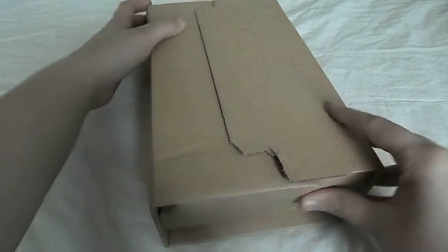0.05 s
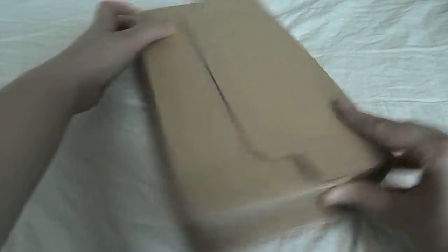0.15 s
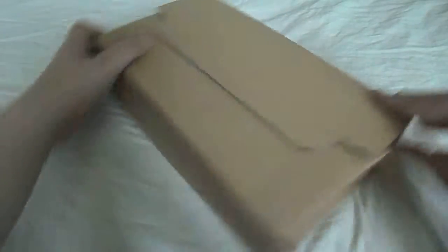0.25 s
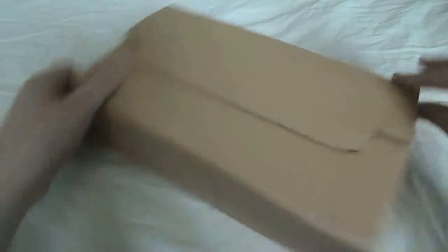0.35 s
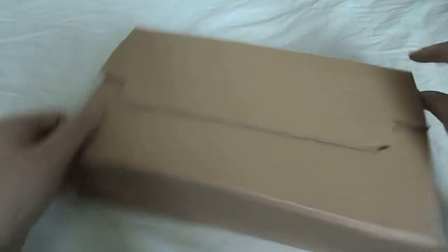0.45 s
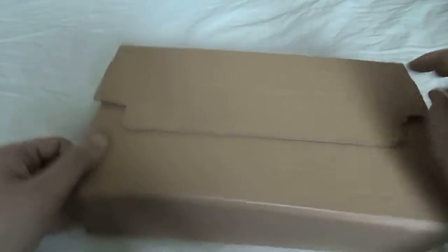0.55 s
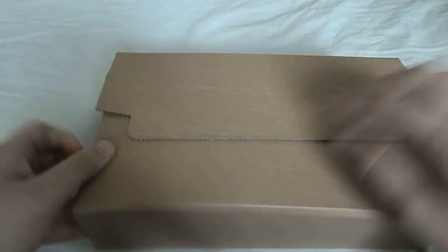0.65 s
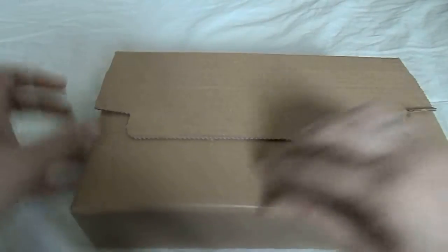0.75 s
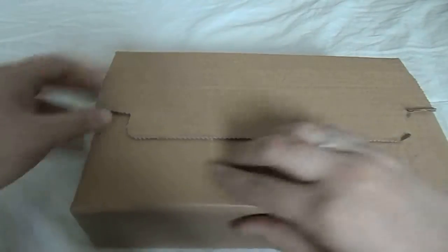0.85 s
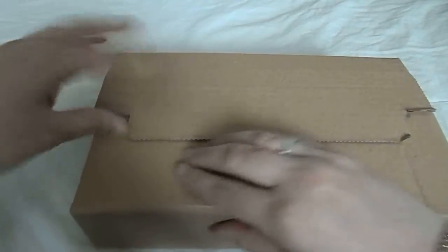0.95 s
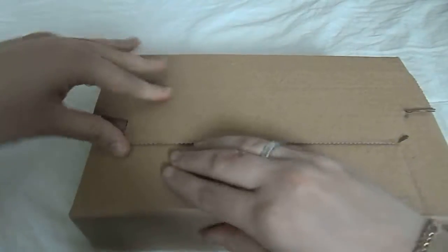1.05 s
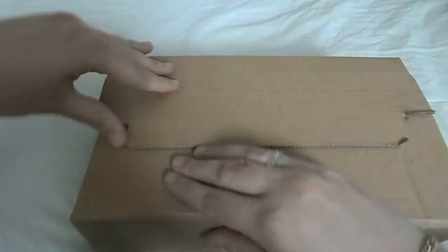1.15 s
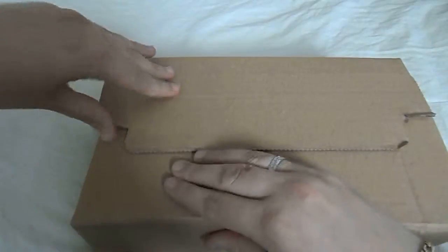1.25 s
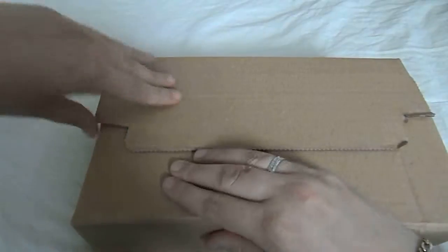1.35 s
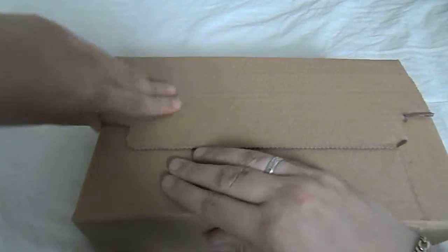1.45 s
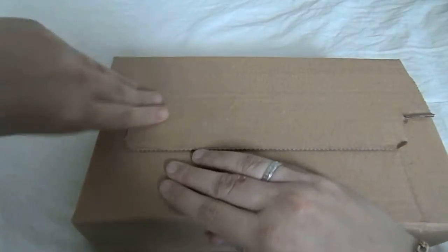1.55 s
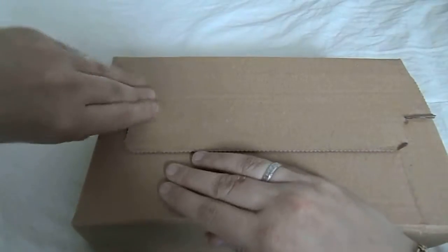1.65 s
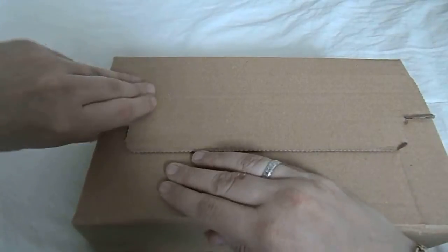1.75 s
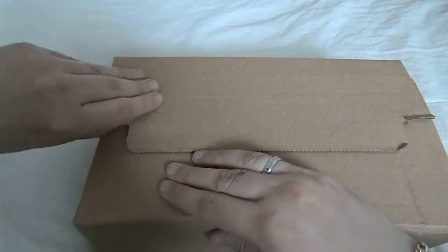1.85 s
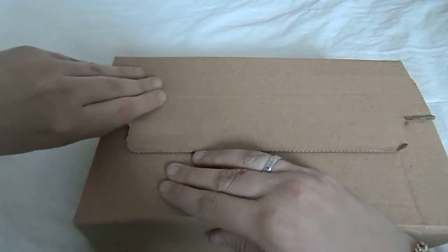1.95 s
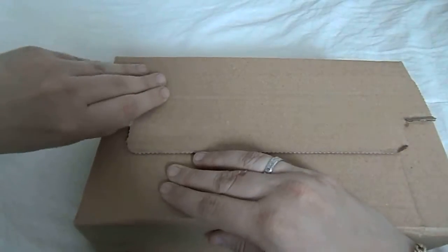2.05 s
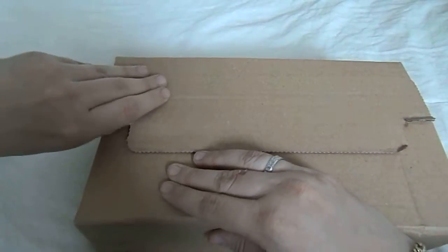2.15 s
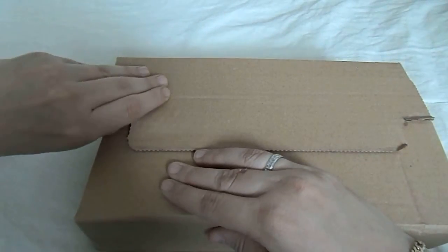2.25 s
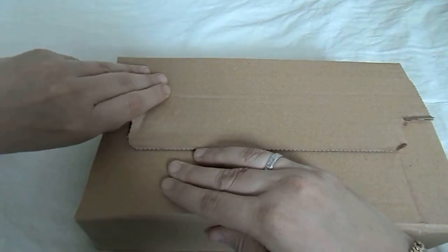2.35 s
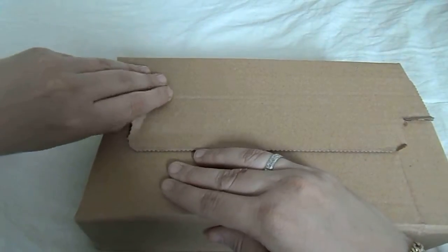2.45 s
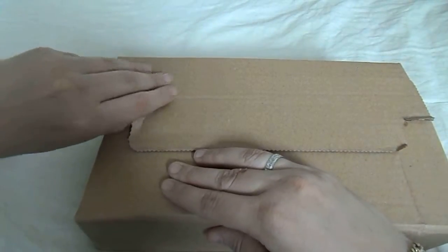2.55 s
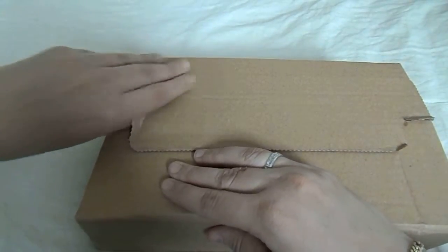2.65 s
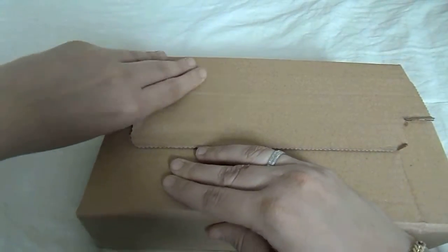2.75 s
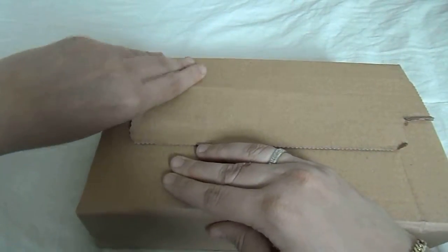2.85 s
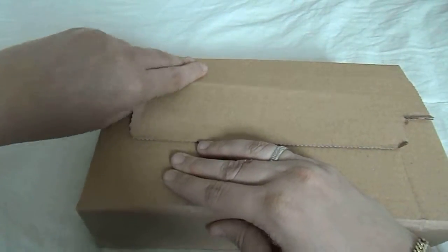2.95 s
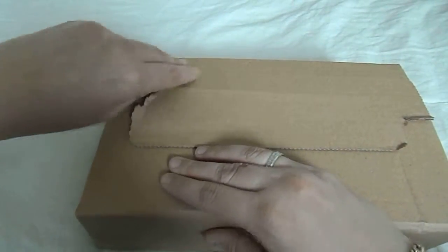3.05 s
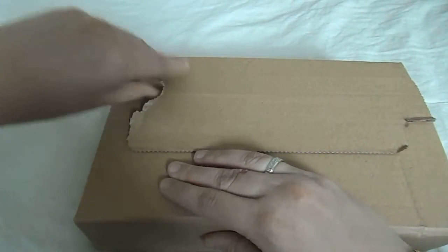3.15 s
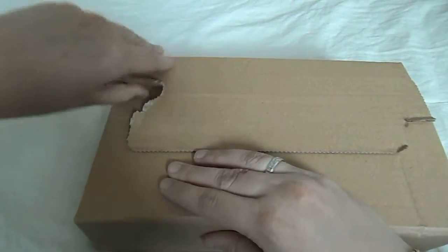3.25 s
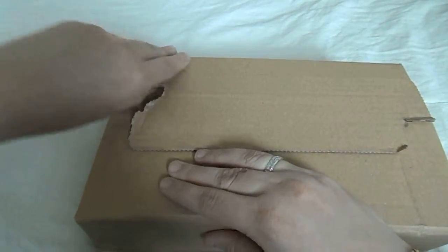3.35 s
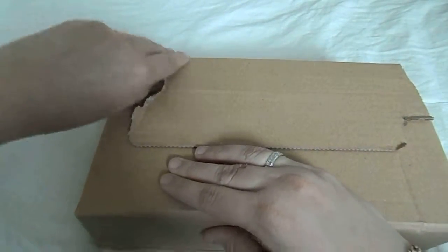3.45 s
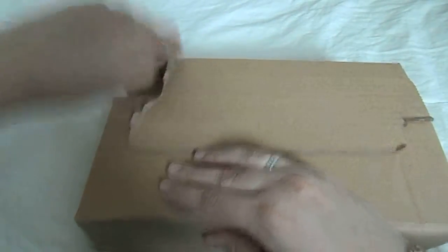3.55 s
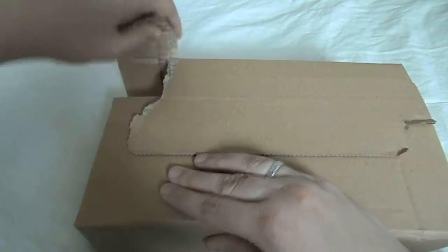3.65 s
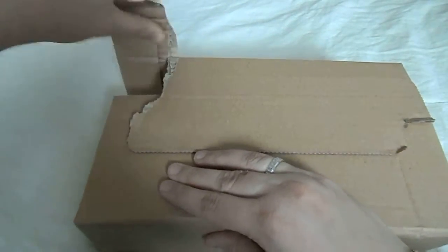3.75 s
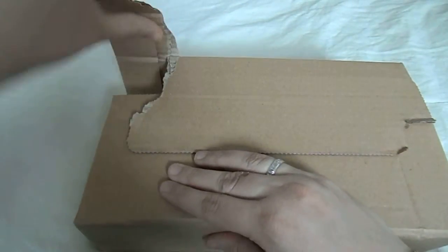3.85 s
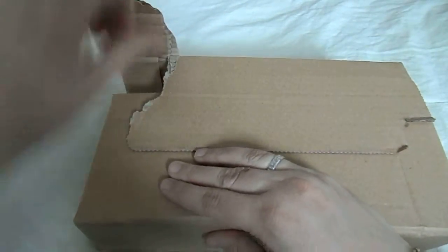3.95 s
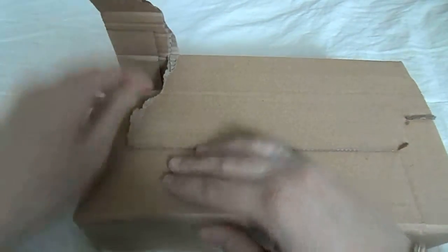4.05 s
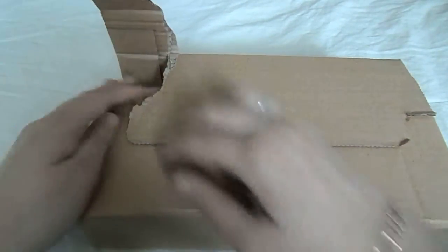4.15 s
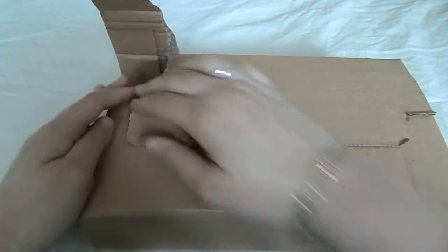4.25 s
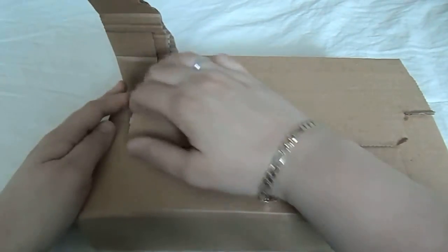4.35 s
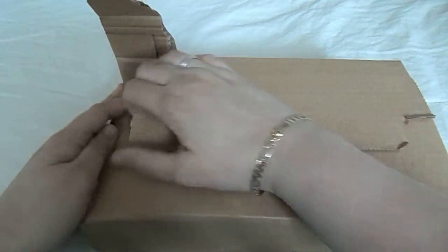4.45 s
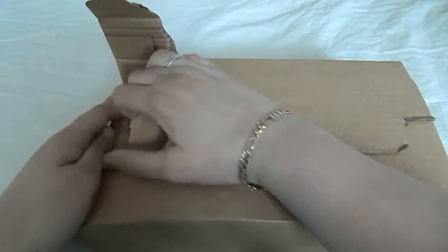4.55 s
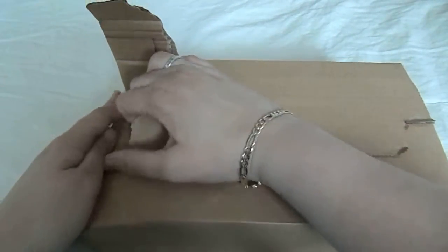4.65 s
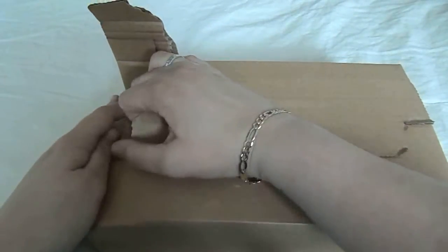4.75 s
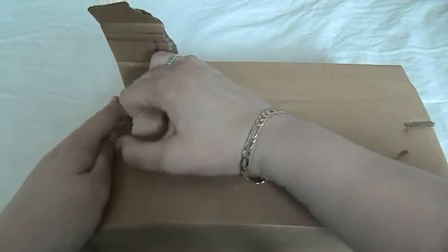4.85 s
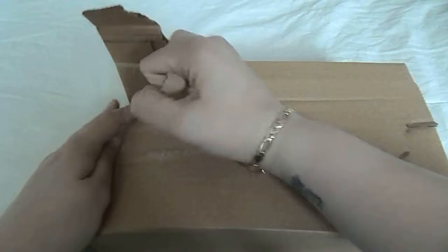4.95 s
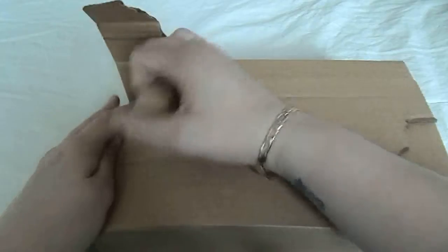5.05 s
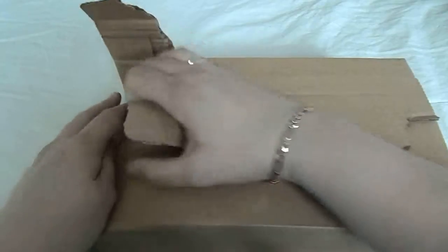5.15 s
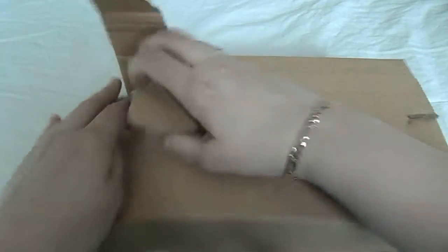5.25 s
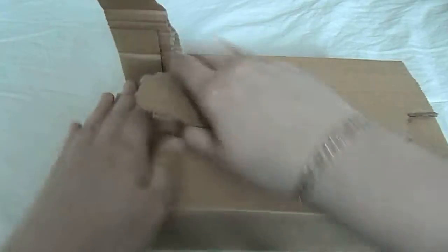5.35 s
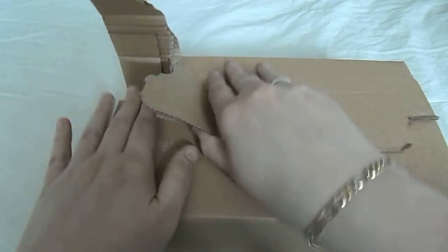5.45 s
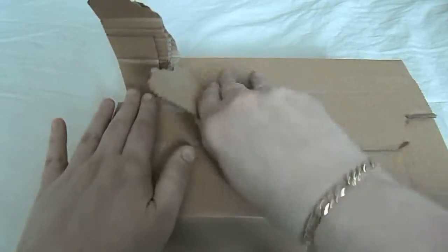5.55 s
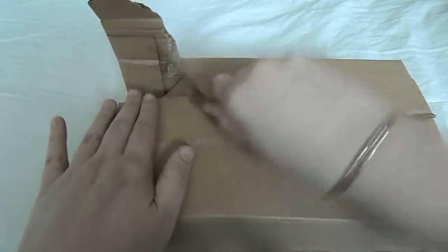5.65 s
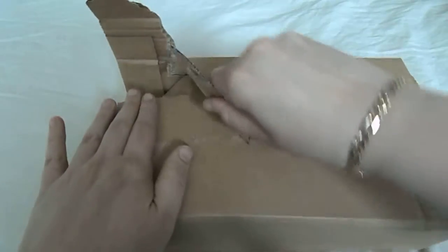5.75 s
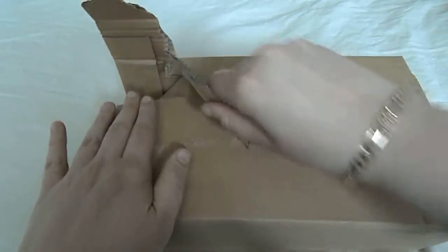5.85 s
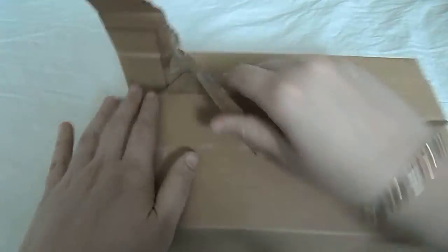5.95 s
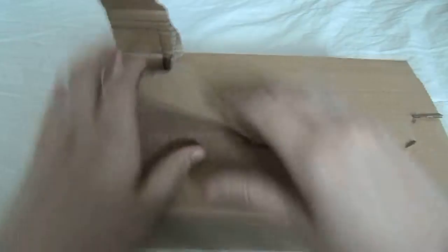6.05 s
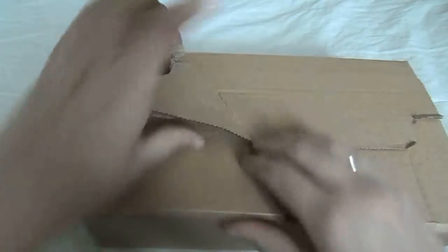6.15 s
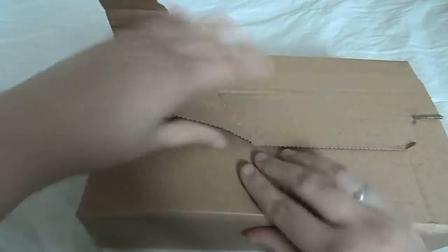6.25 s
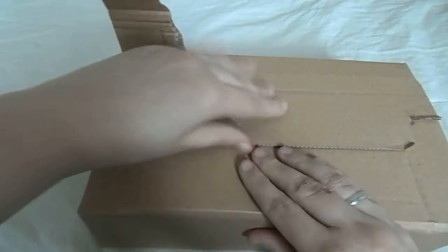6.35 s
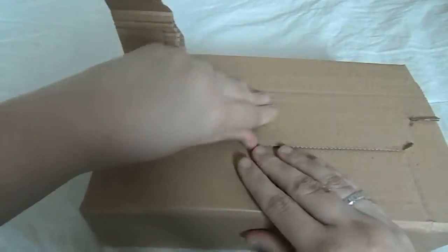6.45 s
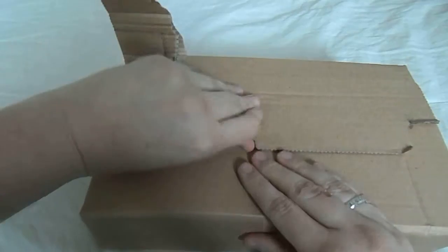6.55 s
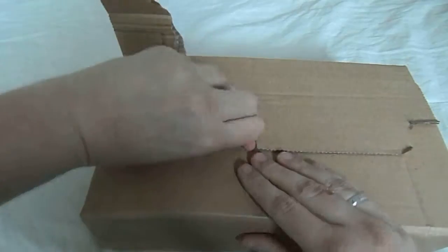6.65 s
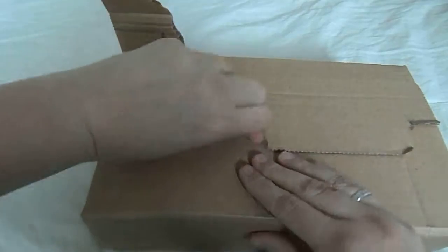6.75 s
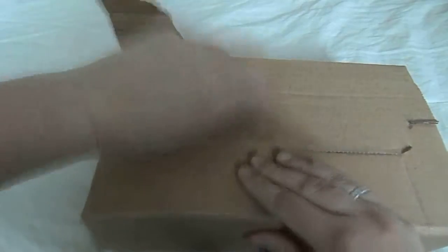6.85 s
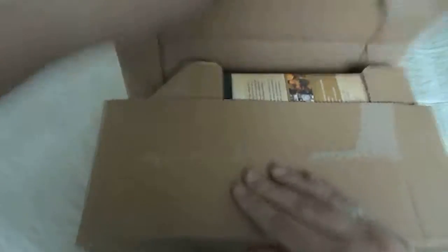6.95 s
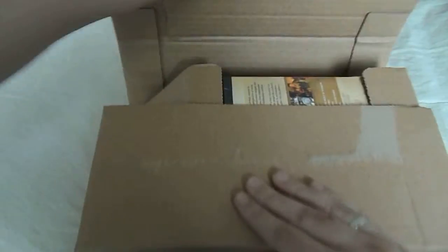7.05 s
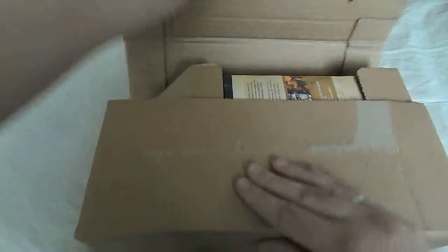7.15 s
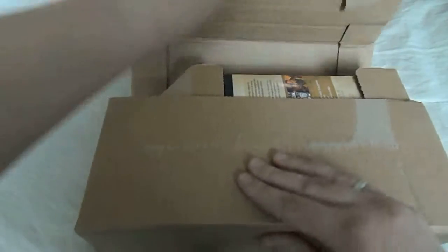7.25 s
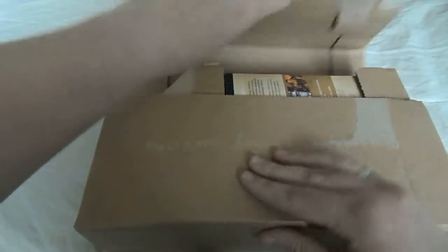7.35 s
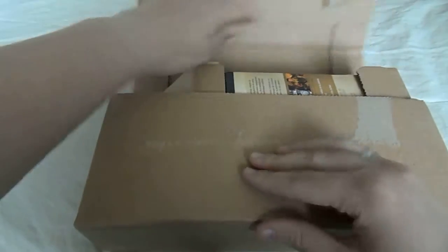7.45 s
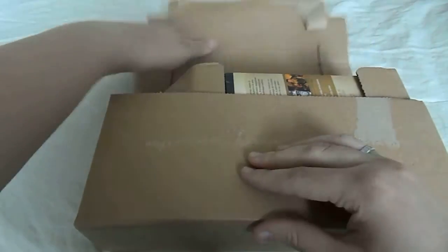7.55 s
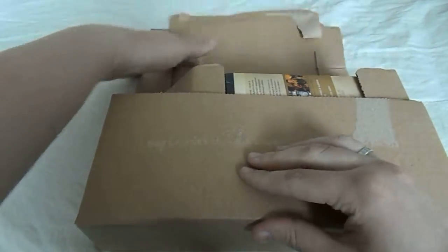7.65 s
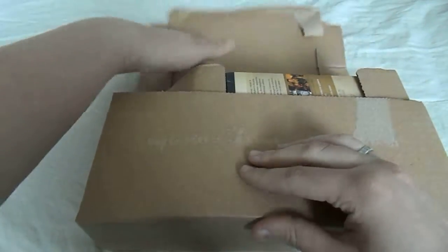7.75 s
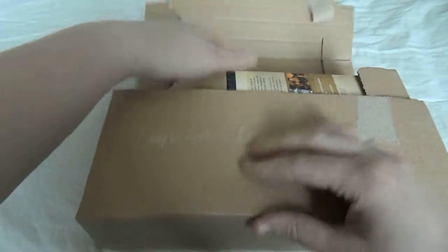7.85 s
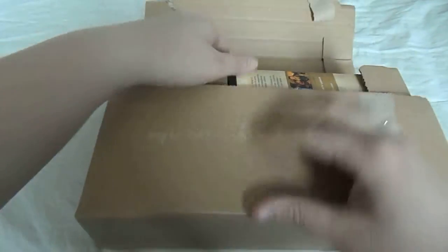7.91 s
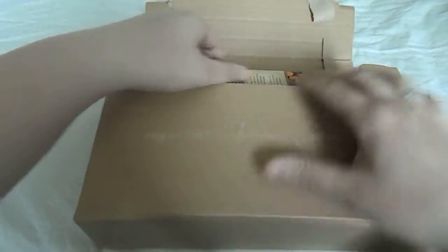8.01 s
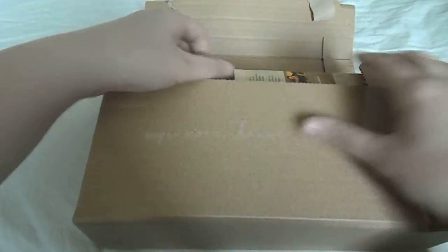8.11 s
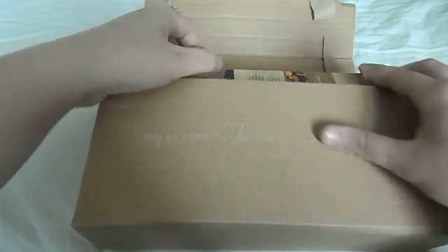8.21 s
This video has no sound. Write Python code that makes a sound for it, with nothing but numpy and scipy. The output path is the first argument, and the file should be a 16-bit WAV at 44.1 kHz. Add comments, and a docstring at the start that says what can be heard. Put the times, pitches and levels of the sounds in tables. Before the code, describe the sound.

Hands rub and press a hollow cardboard box, then tear it open with crackling fibres, sharp snaps and one loud pop, close up indoors.

```python
"""Bedroom: a cardboard box on a bed is turned, pressed and torn open by hand, heard close by in stereo.
Snaps of glue and fibres are noise bursts and short tone swings that drum the hollow box; a flap creaks.
Fingers and sheet rub the card as fluttering, ticking noise. Noise bursts and rubbing ring shared box
modes; the tone swings and creak sound directly. The walls answer the snaps with decaying noise;
hiss and a faint far hum lie beneath. The loudest snaps clip."""
import sys
import numpy as np
from scipy import signal
from scipy.fft import rfft, irfft, next_fast_len
from scipy.io import wavfile
from scipy.ndimage import uniform_filter1d, map_coordinates

SR = 44100
rng = np.random.default_rng(int(sys.argv[2]) if len(sys.argv) > 2 else 0)


def wav_out(sig):
    """Save sig, one row per channel (or a flat mono array), as 16-bit PCM at SR to the path in sys.argv[1]."""
    wavfile.write(sys.argv[1], SR, np.round(np.clip(np.atleast_2d(sig).T, -1, 1) * 32767).astype(np.int16))


N = 365148

# Room and microphone noise spectrum: (frequency [Hz], relative density [dB])
HISS_SPECTRUM = [(30, -45), (90, -4), (270, 7), (530, 1), (760, 4), (1320, -4), (2500, -9), (4500, -9.5),
                 (8000, -14.5), (12600, -35), (16000, -9)]
# Left-right likeness of noise: (frequency [Hz], correlation [-1..1])
STEREO_LIKENESS = [(60, -1.3), (150, 0.84), (500, 1), (1500, 0.83), (3000, 0.56), (6000, 0.11),
                   (14000, 0.16)]
# Panel, hollow, crack, fibre: (low edge [Hz], high edge [Hz], room level [dB], room T60 [s])
PART_BANDS = [(526, 1230, -9, 0.22), (197, 542, -10.5, 0.2), (1500, 5860, -7.5, 0.28),
              (4930, 24400, -9, 0.21)]
# Modes of the box: (frequency [Hz], width [Hz], relative level [dB])
BOX_MODES = [(274.5, 85, -3.5), (411, 103, 4.5), (520, 140, 3.5), (610, 139, 4), (733, 237, 0),
             (988, 186, 2), (1296, 480, -2), (1600, 422, 4.5), (2074, 1180, 3), (2860, 933, 4.5),
             (3620, 746, 2.5), (4470, 850, -1), (5480, 2400, -3), (7340, 8000, -7), (12830, 8400, -11)]
# Echoes off bed, hands and headboard: (delay [ms], level [dB])
NEAR_ECHOES = [(1.9, -33), (3.4, -20.5), (8.2, -16), (14.7, -21)]
# Flap bending before it rips: (time [s], level [dB])
CREAK_LEVELS = [(3.32, -72), (3.336, -54), (3.365, -43), (3.43, -50), (3.46, -72), (3.51, -62),
                (3.53, -32.5), (3.601, -36), (3.617, -11.5), (3.66, -70)]
# Hands resting on the card: (panel, hollow, crack, fibre) levels [dB]
REST_DB = [-55.5, -54, -67, -58.5]
# Strokes of rubbing and tearing: (full strength from [s], rise [s], hold [s], fall [s],
# panel [dB], hollow [dB], crack [dB], fibre [dB])
STROKES = [(0.06, 0.23, 0.0083, 0.1, -44.5, -57, -45.5, -43),
           (0.233, 0.089, 0.26, .5, -39, -44.5, -38, -37.5), (0.683, .2, .03, 0.18, -43.5, -51, -50.5, -48),
           (0.904, 0.091, 0.05, 0.17, -41.5, -48, -44, -39), (1.0, 0.061, .04, 0.067, -53, -60, -50, -40),
           (1.046, 0.035, 0.02, 0.055, -36, -62, -45, -41),
           (1.212, 0.094, 0.017, 0.12, -36, -54, -46.5, -41),
           (1.37, 0.27, 0.029, 0.23, -41, -45, -45, -42.5),
           (1.586, 0.22, 0.12, 0.16, -42.5, -42, -50, -48.5),
           (1.765, .1, 0.16, 0.37, -41.5, -45.5, -44.5, -48),
           (2.045, 0.066, 0.0096, 0.092, -38, -36, -38, -37),
           (2.236, 0.074, 0.083, 0.31, -45, -50, -49, -47),
           (2.403, 0.066, 0.039, 0.042, -38, -39, -37.5, -37.5),
           (2.664, 0.14, 0.04, 0.057, -32.5, -37.5, -37, -40.5),
           (2.744, .02, 0.05, 0.16, -39.5, -43, -46, -41), (2.971, .012, 0.0087, .05, -27.5, -38, -30, -31),
           (3.061, 0.075, 0.0062, 0.11, -26.5, -28, -27, -32.5),
           (3.15, .05, 0.098, 1, -39.5, -43, -45.5, -45), (3.526, 0.01, 0.062, .05, -38.5, -36, -44, -35),
           (3.615, 0.019, 0.034, 0.14, -27.5, -35, -22.5, -25.5),
           (4.164, 0.061, 0.048, 0.061, -36, -46, -42.5, -43),
           (4.334, 0.0084, 0.12, 0.14, -34, -40, -36, -42), (4.523, .12, 0.015, 0.59, -31, -38, -38, -40.5),
           (4.876, 0.034, .05, 0.16, -25.5, -36, -26.5, -28), (5.312, 0.17, 0.14, 0.3, -33, -42, -37, -37),
           (5.667, 0.032, 0.073, 0.14, -33.5, -48, -33, -31.5),
           (6.04, 0.33, .01, 0.018, -37, -44, -41.5, -40.5),
           (6.055, 0.011, 0.039, 0.14, -25.5, -33, -36.5, -44),
           (6.158, .03, 0.084, 0.084, -34, -45, -41.5, -43.5),
           (6.325, 0.15, 0.075, 0.069, -30.5, -43, -38, -41),
           (6.448, 0.066, 0.069, 0.19, -40, -42, -41.5, -41.5),
           (6.673, 0.086, 0.016, 0.45, -41, -43, -42, -41),
           (6.927, 0.019, 0.043, 0.015, -18.5, -20, -14, -23),
           (6.974, .02, 0.0081, 0.13, -24, -27, -30, -29.5), (7.295, 0.16, .02, 0.27, -44, -43, -48, -48.5),
           (7.534, 0.15, .09, 0.18, -42, -44.5, -45.5, -44.5),
           (7.898, 0.064, 0.095, 0.6, -40.5, -51, -43, -39.5), (8.05, 0.27, .2, .2, -36.5, -39, -36, -40)]
# Snaps and taps: (time [s], panel [dB], hollow [dB], crack [dB], fibre [dB],
# burst 1/e time [ms], panel swing [Hz])
SNAPS = [(0.573, -26, -30, -30.5, -25.5, 14, 515), (0.9399, -29.5, -30.5, -29, -27, 8.5, 1005),
         (1.2295, -26, -49, -42, -40, 2.4, 884), (1.2414, -22, -52, -11, -8.5, 0.55, 1020),
         (1.41, -32, -40, -35, -32.5, 9.5, 910), (1.5448, -28.5, -26.5, -43, -35, 6.1, 1000),
         (1.5551, -40, -29.5, -35, -31.5, 36, 1217), (1.5984, -52, -24, -39, -35, 8.3, 1080),
         (1.6423, -34, -17, -49, -50, 1.3, 523), (1.6855, -34, -44, -32.5, -32, 13, 587),
         (1.7223, -28, -39, -52, -48, 4.8, 990), (1.9338, -34, -31, -35, -29, 2, 920),
         (2.0484, -7, -16.5, -14.5, -11, 2, 650), (2.2106, -28, -37, -37, -52, 1.5, 606),
         (2.231, -39, -35, -29.5, -26.5, 2.4, 790), (2.3049, -28, -55, -25.5, -20, 1.8, 810),
         (2.381, -25, -40, -25, -20, 0.74, 770), (2.3956, -24.5, -41, -28, -22, 1.7, 584),
         (2.4164, -22, -49, -19, -36, 1.4, 656), (2.5224, -20.5, -28, -27, -47, 0.77, 1590),
         (2.5435, -26.5, -50, -50, -51, 1.8, 930), (2.6702, -29, -53, -22, -21, 2, 830),
         (2.7202, -13.5, -33, -7, -4.5, 6.6, 1040), (2.775, -18, -37, -11.5, -9.5, 1.6, 1150),
         (2.9657, -18, -54, -24, -22, 1.5, 656), (2.9772, -18, -31.5, -14, -7.5, 1.04, 560),
         (2.9926, -13.5, -36, -18, -33, 1, 1260), (3.0012, -24, -26, -23, -19.5, 4.8, 1020),
         (3.0395, -16, -27, -21, -16.5, 3.5, 910), (3.0455, -16.5, -29, -18.5, -20, 10, 1000),
         (3.0721, -8, -27, -14, -17, 8.1, 517), (3.0803, -9, -19, -19, -7.5, 2.8, 980),
         (3.087, -14, -36, -18, -12, 1.6, 696), (3.104, -17, -39, -31, -37, 0.93, 513),
         (3.3831, -24, -28.5, -44, -28, 2, 895), (3.52, -27, -29, -17, -17, 1.3, 1020),
         (3.533, -23.5, -30, -24, -27, 5, 513), (3.5584, -35, -32, -32, -29, 11, 990),
         (3.6104, -13, -15.5, -8, -10.5, 7.3, 790), (3.6217, -6, -13, -6, 1, 3.35, 740),
         (3.635, -22.5, -25, -16, -36, 12, 790), (3.6757, -22, -32, -18, -15.5, 5.6, 820),
         (3.7952, -30.5, -31, -48, -30, 10, 977), (3.862, -51, -45.5, -55, -36, 38, 760),
         (3.9458, -52, -58, -58, -32, 1.5, 1040), (3.9645, -57, -60, -35.5, -38, 4.2, 560),
         (4.003, -55, -64, -39, -52, 2.3, 730), (4.085, -33.5, -41, -41, -45, 3.3, 626),
         (4.124, -27, -26, -44, -51, 1.1, 1060), (4.1565, -25, -26, -40, -29, 3.2, 930),
         (4.2145, -29.5, -53, -44, -34, 8.8, 930), (4.247, -12.5, -27, -26, -29, 1.3, 820),
         (4.252, -16, -30, -27, -14.5, 1.9, 790), (4.3328, -11, -37, -16, -42, 1.5, 1040),
         (4.349, -18, -33, -38, -45, 1.1, 800), (4.361, -18, -43, -38, -42, 2, 810),
         (4.386, -17.5, -27, -43, -44, 3.2, 790), (4.4208, -26, -28, -30, -42, 6.1, 960),
         (4.43, -32, -32, -20, -31, 12, 990), (4.465, -39, -42, -21, -34, 2.8, 990),
         (4.491, -38, -42, -26, -33, 1.4, 990), (4.5943, -34, -17, -41, -47, 1.7, 645),
         (4.6593, -20, -32, -37, -49, 2.2, 850), (4.7682, -30.5, -45, -42, -35, 12, 1065),
         (4.818, -21, -49, -45, -42, 0.85, 1050), (4.856, -18.5, -41, -33, -27, 4.3, 850),
         (4.8721, -12.5, -14.5, -5, -3.5, 2.5, 1625), (4.882, -20, -42, -30, -10, 1.7, 1570),
         (4.9095, -12, -42, -22, -13, 1.9, 1050), (4.9227, -5, -30, 4.5, -3.5, 2.7, 1030),
         (4.934, -18, -35, -21, -7, 1.3, 1010), (4.943, -2.5, -4, -40, -3, 5.3, 1006),
         (5.0911, -31.5, -34, -23.5, -28, 1.3, 1590), (5.2332, -35, -30.5, -40, -60, 2.5, 1000),
         (5.3398, -22.5, -42, -43, -43, 4.5, 910), (5.5194, -19.5, -30, -21.5, -22, 2.7, 1040),
         (5.601, -34, -50, -58, -23, 1.8, 1120), (5.6619, -5.5, -28, -16, -1.5, 3.6, 900),
         (5.6704, -14.5, -21, -46, -14.5, 7.3, 1236), (5.6992, -35, -45, -42, -12, 1.8, 860),
         (5.736, -13.5, -33, -52, -13, 1.9, 1070), (5.8478, -29.5, -34, -37, -34, 5.8, 714),
         (5.946, -44, -55, -35, -24, 1.2, 1100), (6.0439, -2, -6.5, -8, -13, 3.37, 683),
         (6.122, -44, -43, -31, -25.5, 9.2, 900), (6.2026, -38, -42, -30, -36, 6.9, 890),
         (6.2424, -23, -37, -36, -44, 4.1, 1050), (6.3812, -40, -22.5, -47, -47, 2.1, 960),
         (6.3974, -25, -42, -49, -50, 5.2, 930), (6.504, -48, -50, -27, -40, 1.3, 1590),
         (6.52, -38, -50, -45, -30, 2, 670), (6.5636, -26, -39, -37, -46, 1.4, 880),
         (6.5757, -21, -20.5, -43, -42, 1.4, 900), (6.6188, -29, -25, -51, -55, 1.4, 710),
         (6.6393, -21, -29, -48, -44, 1.2, 750), (6.7733, -33, -43, -26, -34, 1.5, 930),
         (6.7813, -22.5, -28, -26, -25.5, 5.5, 950), (6.7924, -21, -28, -26, -6, 0.66, 1060),
         (6.9168, -0.5, -3, -3.5, 0.5, 4.8, 1000), (6.9398, -18, -8, -15, -5, 7, 645),
         (6.96, -16, -20, -5.5, -12, 3.8, 1030), (6.97, -10.5, -7.5, -28, -8, 5, 950),
         (6.9974, -25, -15.5, -37, -35, 3, 1130), (7.004, -28, -29, -37, -32, 2.3, 1310),
         (7.205, -37, -60, -39, -39, 2.4, 1040), (7.2992, -40, -21.5, -42, -46, 8.7, 860),
         (7.336, -31, -23, -42, -46, 10.4, 730), (7.398, -45, -55, -42, -33, 1.8, 900),
         (7.4513, -9.5, -11.5, -19, -18.5, 3.8, 650), (7.4896, -39, -17.5, -46, -41, 1.4, 585),
         (7.575, -31, -55, -27, -30, 2.4, 1660), (7.5965, -25, -26.5, -38, -34, 7.3, 880),
         (7.6273, -45, -29, -49, -52, 3.2, 760), (7.905, -32, -33, -37, -43, 6.3, 1140),
         (8.1191, -12.5, -16, -26, -17.5, 3.1, 940), (8.2128, -15, -15.5, -27, -40, 3.5, 750)]
# Small snaps, mean level over the rubbing: (panel, hollow, crack, fibre) [dB]
SMALL_OVER_DB = [4, 0, 5, 5]

HUM_HZ, HUM_WIDTH_HZ, HUM_DB = 745, 26, -55  # width of one of two passes; mean level
TOP_HZ = 16000
FADE_DB = 19  # lost over one rise or fall time
AIR_HZ, AIR_WIDTH_HZ, AIR_GAIN = 12500, 1800, 0.69  # skin and cloth hiss
PATCHY_DB = 1.8
SMALL_PER_S, SMALL_SCATTER_DB = 14, 2.2  # scatter: one share per part, one common to all
SNAP_PAN_DB, PAN_SCATTER_DB = (4, 1.1), 0.9  # left over right: (panel and hollow, crack and fibre)
HOLLOW_HZ, HOLLOW_RISES_OCT = 397, 0.15  # median swing of a -25 dB blow; rise per 10 dB more


def amp(db):
    """Amplitude of a level in dB."""
    return 10 ** (np.asarray(db) / 20)


def unit(x):
    """x at an RMS of 1."""
    return x / np.sqrt(np.mean(x ** 2) + 1e-20)


def along(points, hz):
    """(Hz, value) points interpolated on a log frequency axis."""
    f, values = np.transpose(points)
    return np.interp(np.log(hz + 1), np.log(f + 1), values)


def wobble(knots_per_s):
    """Smooth curve through random knots."""
    knots = rng.standard_normal(int(N * knots_per_s / SR) + 4)
    return map_coordinates(knots, [np.arange(N) * knots_per_s / SR])


def filtered(x, response):
    """x through a complex frequency response."""
    m = next_fast_len(N + SR // 4)
    return irfft(rfft(x, m) * response(np.fft.rfftfreq(m, 1 / SR)), m)[..., :N]


def resonance(f, hz, width_hz):
    """Second-order band-pass with a peak gain of 1."""
    return 1j * f * width_hz / (hz * hz - f * f + 1j * f * width_hz)


def stereo_noise():
    """White noise, left and right alike as STEREO_LIKENESS sets: mid and side share the power."""
    def mid_side(f):
        angle = np.arccos(np.clip(along(STEREO_LIKENESS, f), -1, 1)) / 2
        return np.array([np.cos(angle), np.sin(angle)])
    mid, side = filtered(rng.standard_normal((2, N)), mid_side)
    return unit(np.array([mid + side, mid - side]))


def side_gains(low_db, high_db):
    """Left and right gains of the four parts from the left-over-right levels."""
    half = np.array([low_db, low_db, high_db, high_db]) / 2
    return amp(np.stack([half, -half], axis=1))


def background():
    """Steady shaped hiss and a narrow band of noise as a wavering hum."""
    hiss = unit(filtered(stereo_noise(), lambda f: amp(along(HISS_SPECTRUM, f))))
    hum = unit(filtered(rng.standard_normal(N), lambda f: resonance(f, HUM_HZ, HUM_WIDTH_HZ) ** 2))
    return amp(-50) * hiss + amp(HUM_DB + 3 * wobble(5)) * hum


def bedroom(force):
    """Wall answer: the power of each part lingers and dies at its own speed, 6 ms late."""
    late_power = np.pad(force ** 2, ((0, 0), (0, 0), (260, 0)))[..., :N]
    answers = []
    for (_, _, room_db, t60_s), power in zip(PART_BANDS, late_power):
        keep = amp(-120 / (t60_s * SR))  # power kept per sample
        lingering = signal.lfilter([1 - keep], [1, -keep], power)
        answers.append(amp(room_db) * np.sqrt(lingering))
    return np.array(answers)


def stroke_levels():
    """Level [dB] of each part: strokes rise, hold and fall, and their powers add."""
    t = np.arange(0, N, 64) / SR
    power = amp(REST_DB)[:, None] ** 2 * np.ones_like(t)
    for s, rise, hold, fall, *db in STROKES:
        before = (s - t) / max(rise, 0.003)
        after = (t - s - abs(hold)) / max(fall, 0.003)
        lost_db = FADE_DB * np.maximum(0, np.maximum(before, after))
        power = power + amp(np.array(db)[:, None] - lost_db) ** 2
    return np.array([np.interp(np.arange(N) / SR, t, 10 * np.log10(p)) for p in power])


def patchy(x, patchy_db):
    """Noise whose colour shifts in patches of time and frequency."""
    z = signal.stft(x, nperseg=256)[2]
    field = uniform_filter1d(rng.standard_normal(z.shape[1:]), size=4, axis=0)
    field = uniform_filter1d(field, size=10, axis=1)
    return unit(signal.istft(z * amp(patchy_db * unit(field)), nperseg=256)[1][:, :N])


def rubbing(levels):
    """Force of skin, cloth and peeling glue: it flutters, and fibres tick in it."""
    ticks = (rng.random(N) < 150 / SR) * amp(1.8 * rng.standard_normal(N))  # 150 per s
    ticks = signal.lfilter([1], [1, -np.exp(-1 / (SR * 0.0014))], ticks)  # 1.4 ms decay
    flutter_db = 1.2 * wobble(35) + 0.78 * wobble(140)
    grain = [unit(amp(flutter_db + 0.3 * wobble(70)) * (1 + tick_share * ticks))
             for tick_share in (0.4, 0.053, 0.44, 0.45)]
    return (amp(levels) * grain)[:, None] * side_gains(5.5, 1.5)[..., None]


def creak():
    """Uneven slips ring two bands of the bent flap."""
    level_db = np.interp(np.arange(N) / SR, *np.transpose(CREAK_LEVELS))
    slips = amp(level_db + 2.5 * wobble(110))

    def flap(f):
        return resonance(f, 2930, 430) ** 2 - 0.45 * resonance(f, 2150, 350) ** 2
    return slips * unit(filtered(rng.standard_normal(N), flap))


def small_snaps(levels):
    """Fibres let go at random moments, their strength following the stroke under them."""
    rows = rng.standard_normal((int(SMALL_PER_S * N / SR), 7))
    at = rng.integers(0, N, len(rows))
    scatter_db = SMALL_SCATTER_DB * (rows[:, :4] + rows[:, 4:5])
    db = levels[:, at].T + SMALL_OVER_DB + scatter_db
    burst_ms = 1.6 * np.exp(0.7 * rows[:, 5])
    panel_hz = 870 * np.exp(0.22 * rows[:, 6])
    return np.c_[at / SR, db, burst_ms, panel_hz]


def snaps(levels):
    """Force of each snap on the four parts, and the short swing of panel and hollow it starts."""
    force, swing = np.zeros((4, 2, N + SR)), np.zeros((2, N + SR))
    ms = np.arange(SR // 12) * 1000 / SR
    for s, panel, hollow, crack, fibre, burst_ms, panel_hz in [*SNAPS, *small_snaps(levels)]:
        rise_oct = HOLLOW_RISES_OCT * (hollow + 25) / 10 + 0.15 * rng.standard_normal()
        hz = np.array([[panel_hz], [HOLLOW_HZ * 2 ** rise_oct]])
        # a low swing lasts over a cycle
        lengths_ms = np.r_[np.maximum(burst_ms, 1400 / hz), [[burst_ms], [burst_ms]]]
        attack = 1 - np.exp(-ms / (0.055 * lengths_ms + 0.018))
        shape = attack * np.exp(-(ms / lengths_ms) ** 2.26)
        size = amp(np.array([panel, hollow, crack, fibre]))
        pan_db = SNAP_PAN_DB + PAN_SCATTER_DB * rng.standard_normal(2)
        push = (size[:, None] * side_gains(*pan_db))[..., None] * shape[:, None]
        # the card buckles, the phase slips
        drift = 0.1 * np.cumsum(rng.standard_normal((2, len(ms))), axis=1)
        tones = np.sin(2 * np.pi * hz * ms / 1000 + drift)
        start = round(s * SR)
        force[..., start:][..., :len(ms)] += push
        swing[:, start:][:, :len(ms)] += (push[:2] * tones[:, None]).sum(axis=0)
    return force[..., :N], np.sqrt(2) * swing[:, :N]


def part_responses(f):
    """Box modes and near echoes inside each part's band, scaled so white noise keeps its level."""
    modes = sum((-1) ** k * amp(db) * resonance(f, hz, width_hz)
                for k, (hz, width_hz, db) in enumerate(BOX_MODES))
    echoes = sum(amp(db) * np.exp(-2j * np.pi * f * ms / 1000) for ms, db in NEAR_ECHOES)

    def low_pass(u):  # flat second order
        return 1 / (1 - u * u + 1j * np.sqrt(2) * u)
    bands = np.array([((f / low) ** 2 * low_pass(f / low) * low_pass(f / high)) ** 2
                      for low, high, *_ in PART_BANDS])
    heard = modes * (1 + echoes) * bands
    return (heard / np.sqrt(np.mean(np.abs(heard) ** 2, axis=1, keepdims=True)))[:, None]


def box():
    """Snap noise, its wall answer and rubbing ring the box modes; the low swings are added directly."""
    levels = stroke_levels()
    blows, swing = snaps(levels)
    noise_share = np.reshape([0.53, 0.49, 1.0, 0.83], (4, 1, 1))  # by part
    skin = filtered(patchy(stereo_noise(), PATCHY_DB),
                    lambda f: 1 + AIR_GAIN * np.abs(resonance(f, AIR_HZ, AIR_WIDTH_HZ)))
    # a small box radiates little bass
    swing = filtered(swing, lambda f: (1j * f / (160 + 1j * f)) ** 4)
    shaking = noise_share * blows * stereo_noise()
    shaking = shaking + rubbing(levels) * skin
    shaking = shaking + bedroom(blows) * stereo_noise()
    return swing + filtered(shaking, part_responses).sum(axis=0)


def scene():
    """Box, creaking flap and background together."""
    return box() + creak() + background()


def record(dry):
    """Weak bass, hard clipping, then a band limit."""
    x = np.clip(filtered(dry, lambda f: (1j * f / (130 + 1j * f)) ** 2), -1, 1)

    def band_limit(f):
        return np.clip((TOP_HZ - f) / 300, 0.2, 1) * (f < 16400)
    return np.clip(filtered(x, band_limit), -1, 1)


dry = scene()
out = record(dry)
wav_out(out)
```